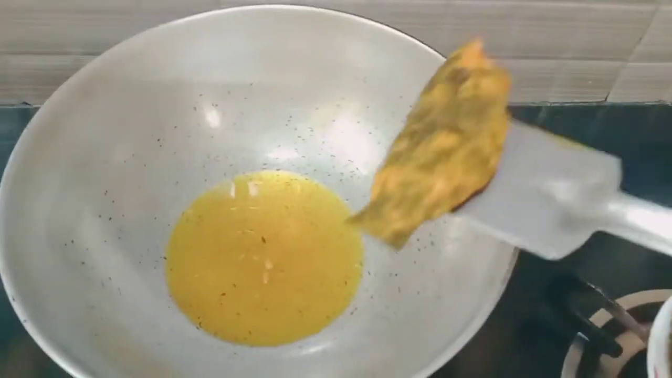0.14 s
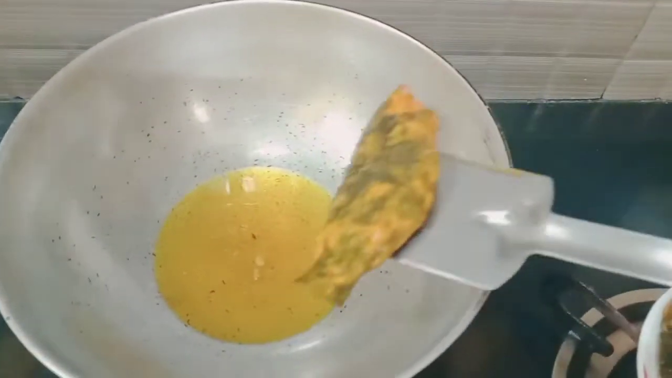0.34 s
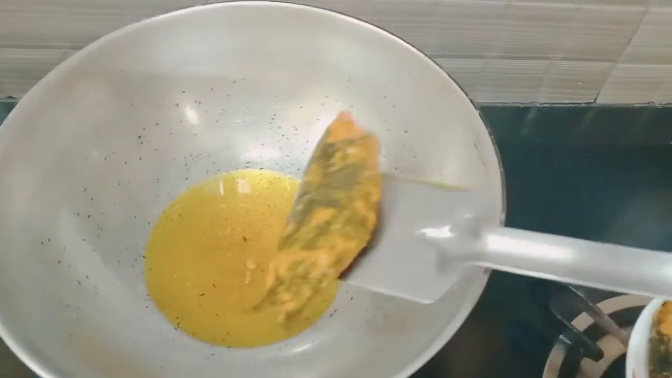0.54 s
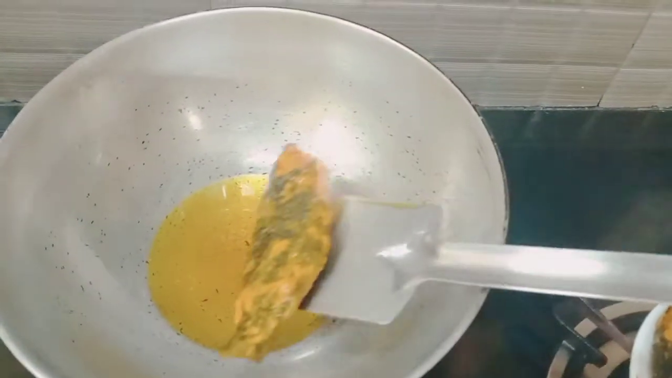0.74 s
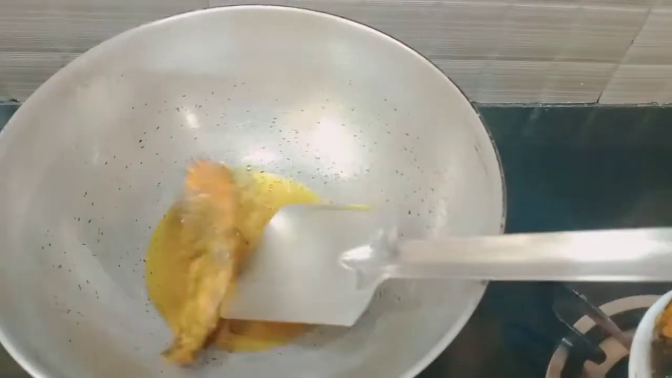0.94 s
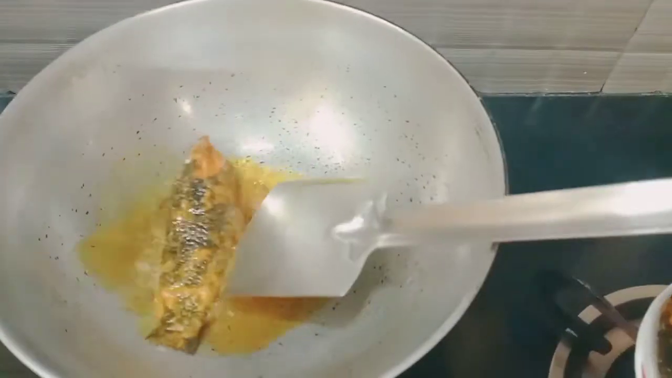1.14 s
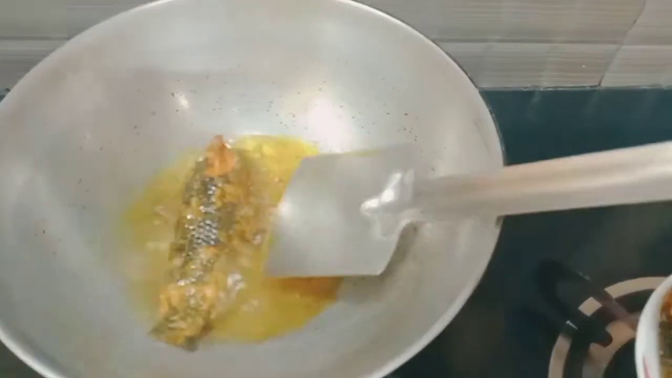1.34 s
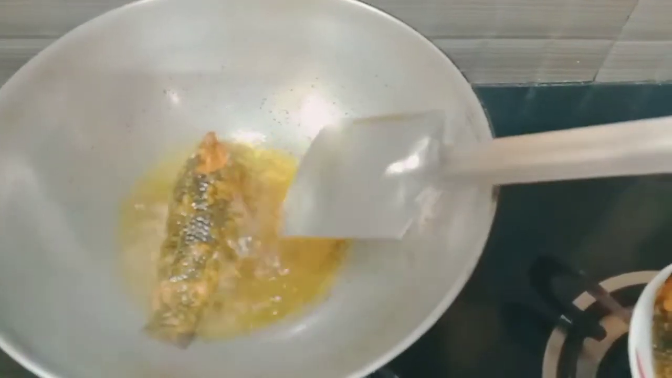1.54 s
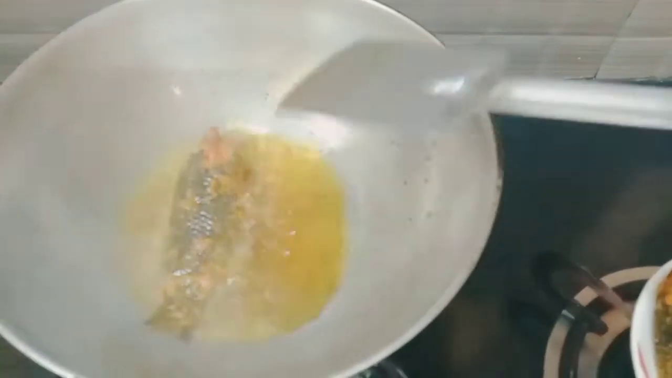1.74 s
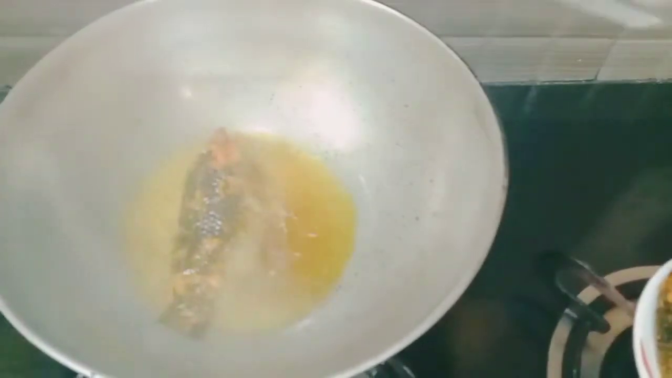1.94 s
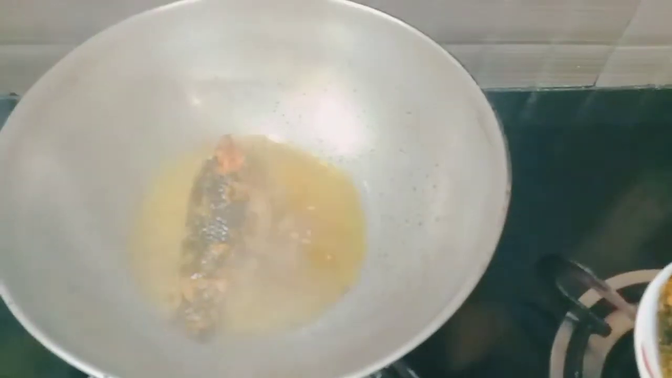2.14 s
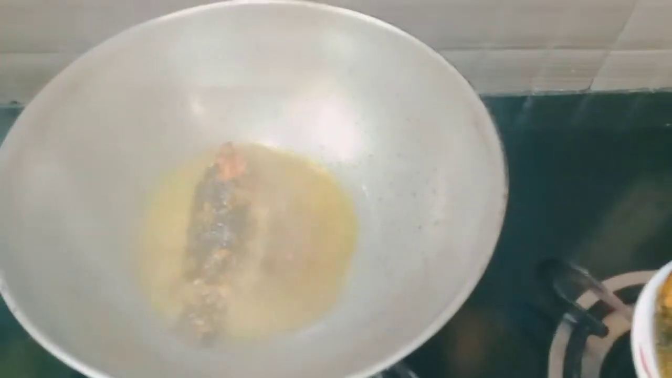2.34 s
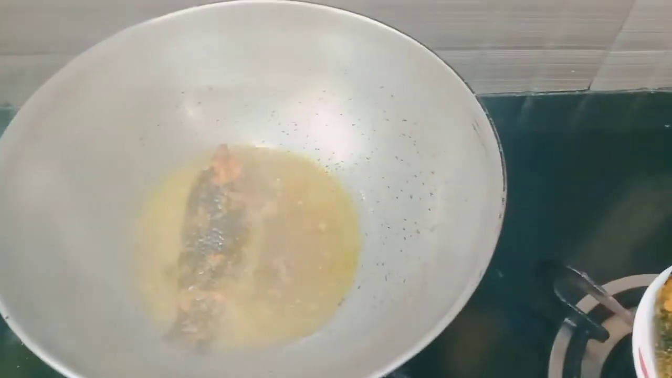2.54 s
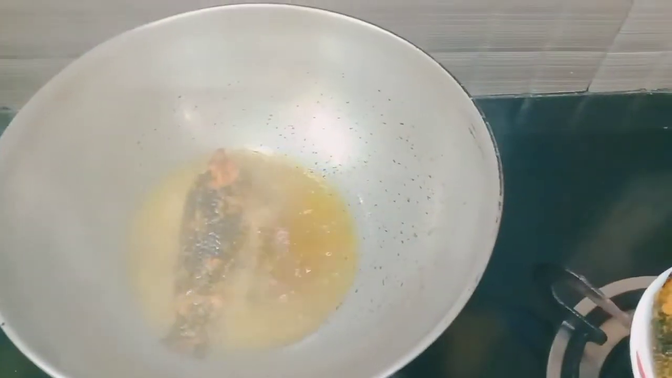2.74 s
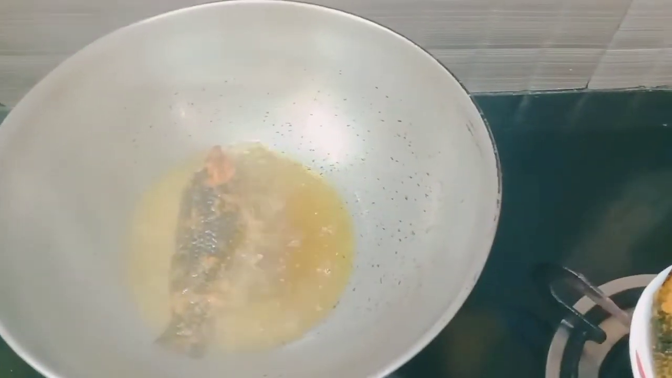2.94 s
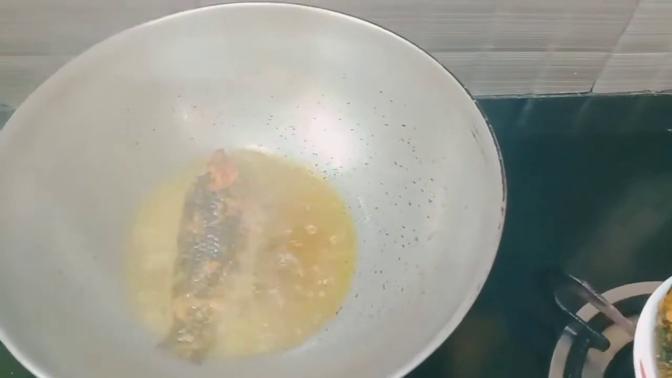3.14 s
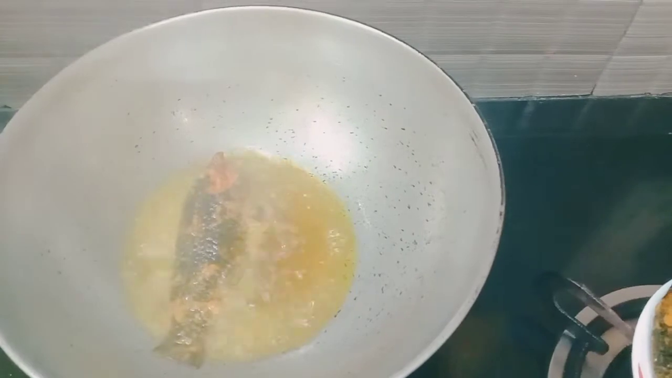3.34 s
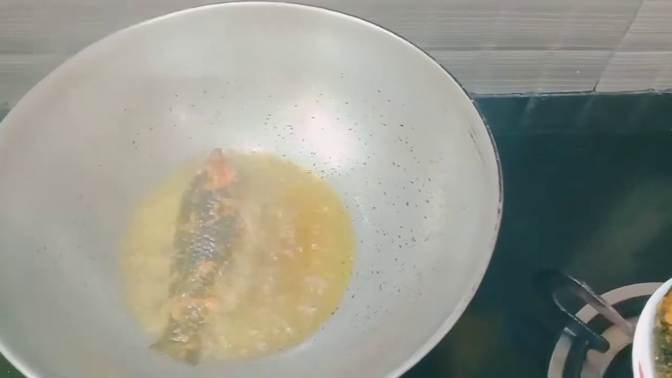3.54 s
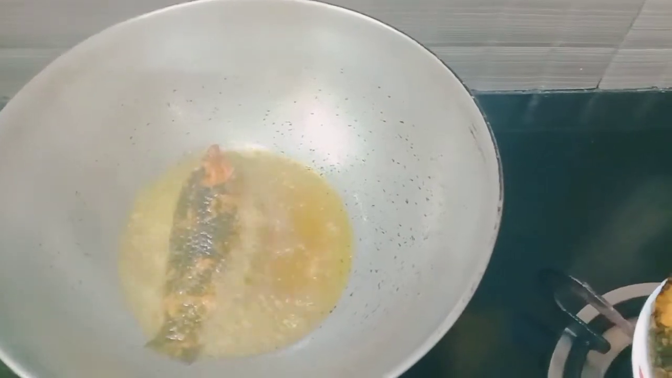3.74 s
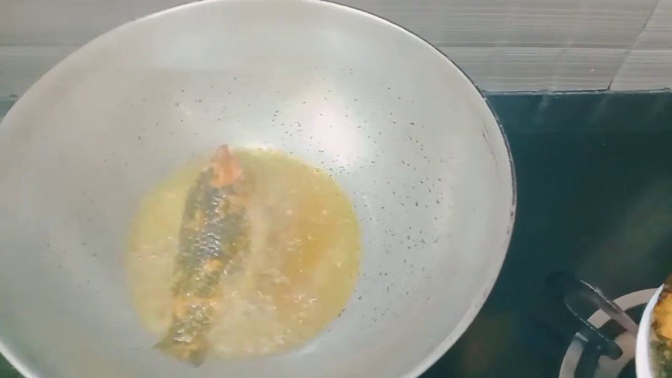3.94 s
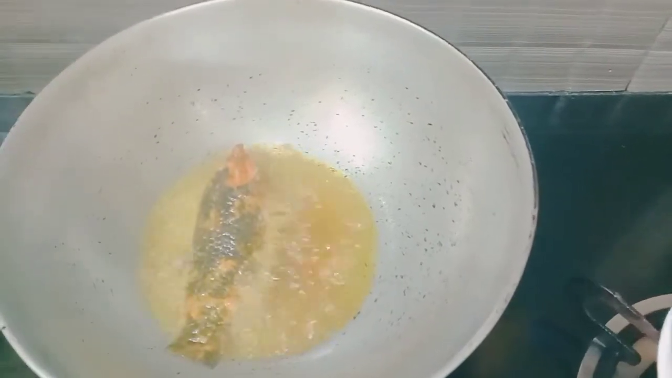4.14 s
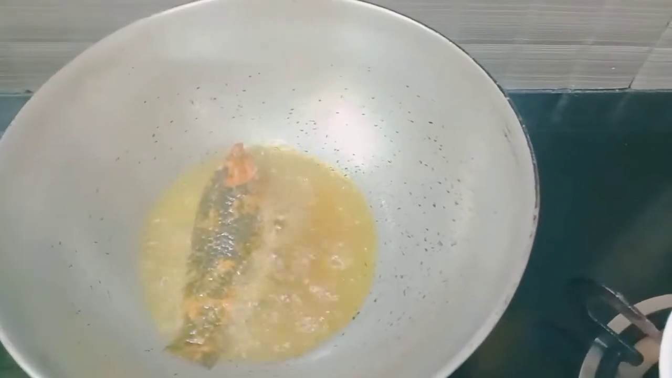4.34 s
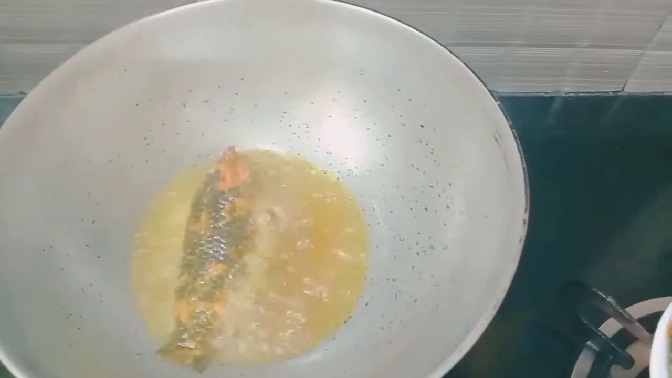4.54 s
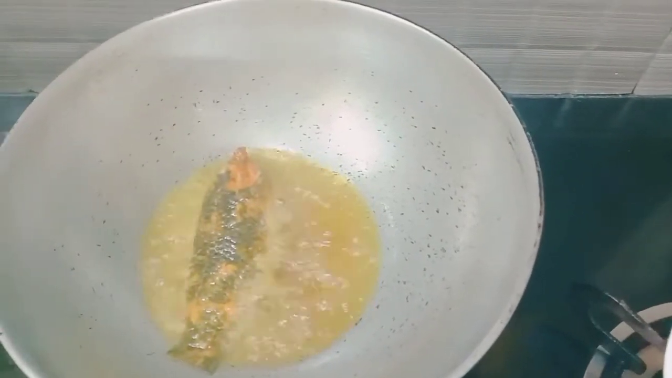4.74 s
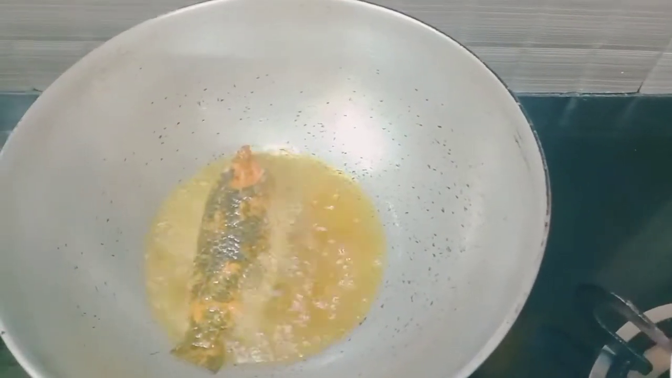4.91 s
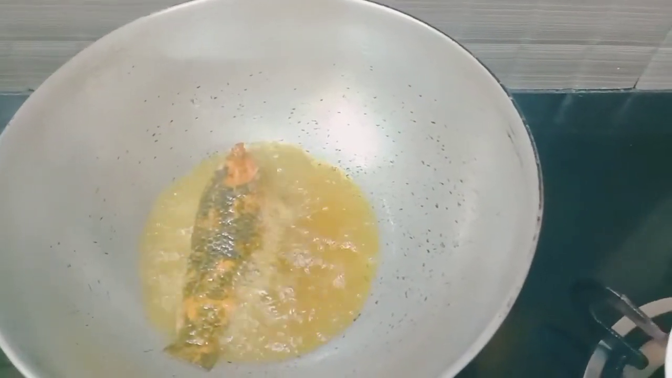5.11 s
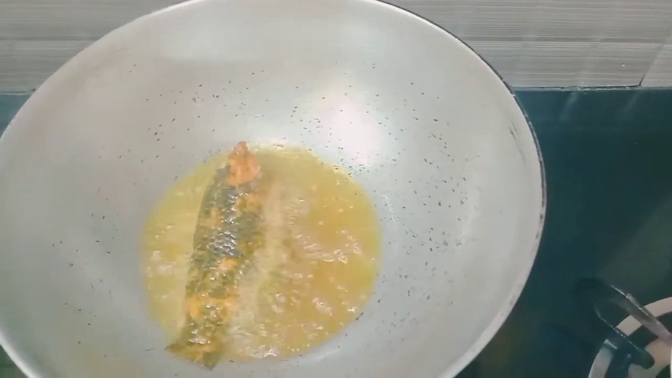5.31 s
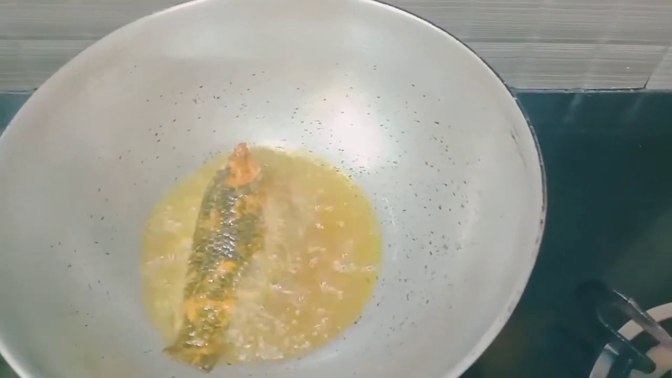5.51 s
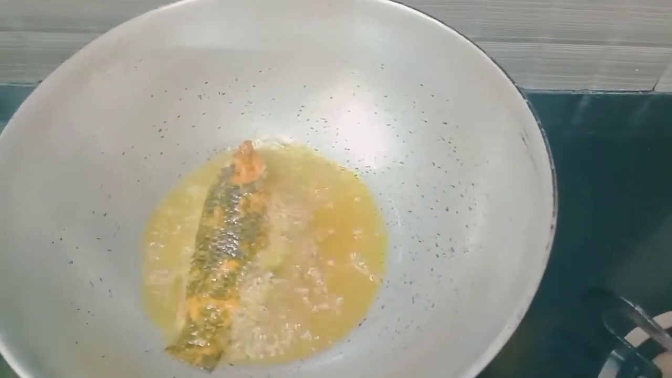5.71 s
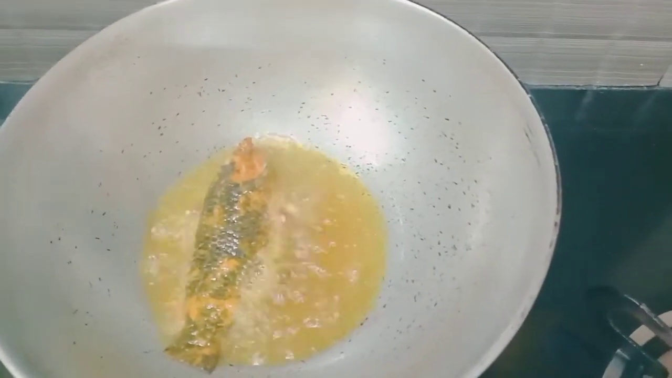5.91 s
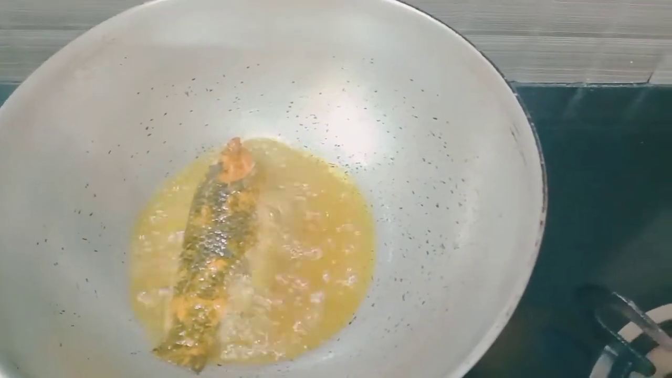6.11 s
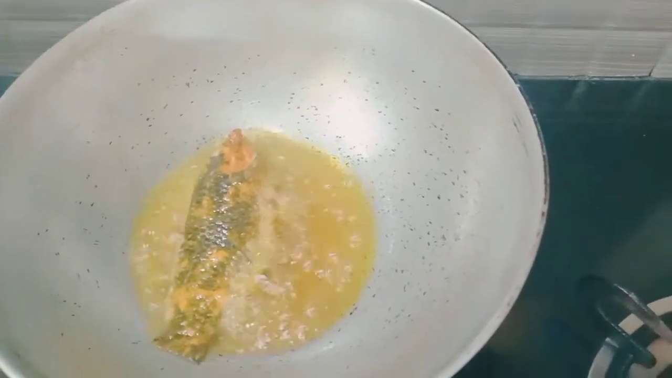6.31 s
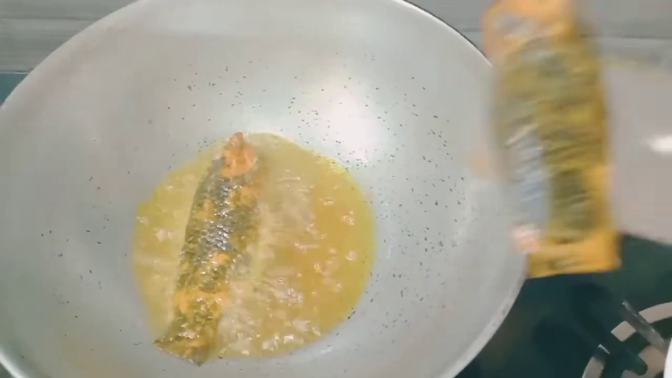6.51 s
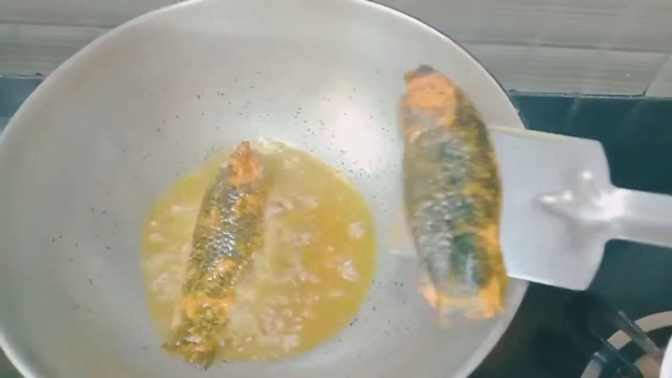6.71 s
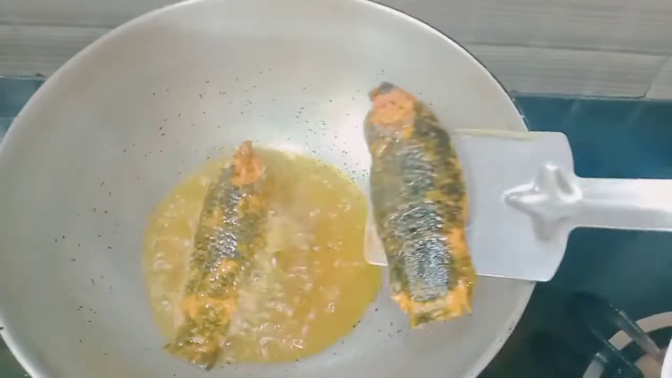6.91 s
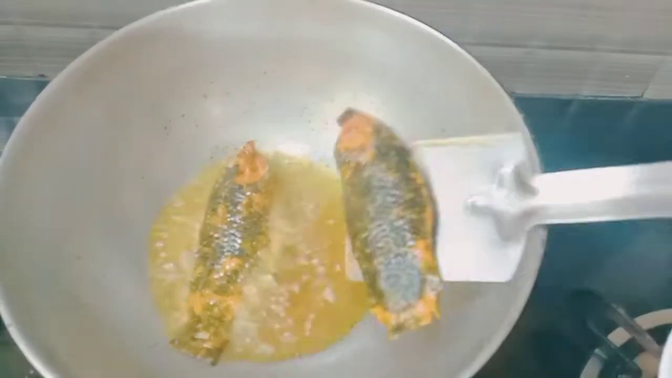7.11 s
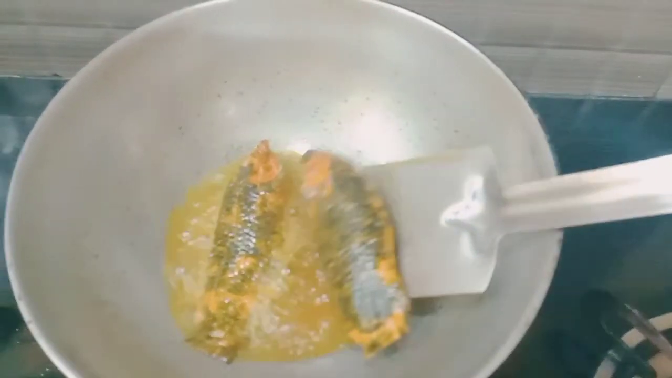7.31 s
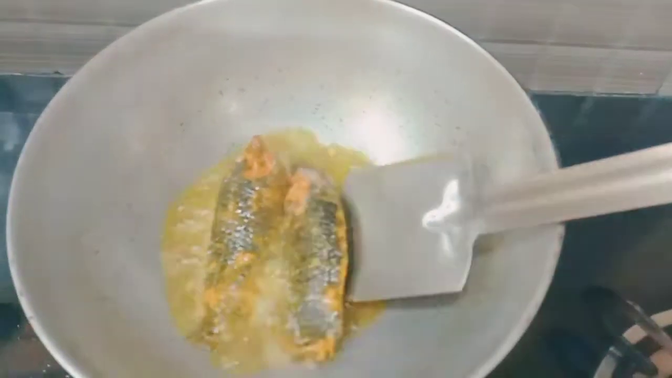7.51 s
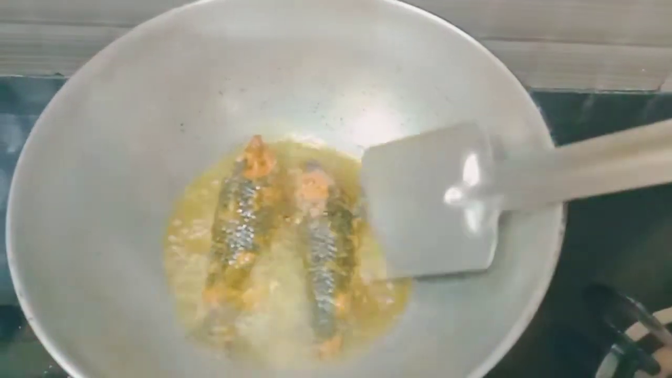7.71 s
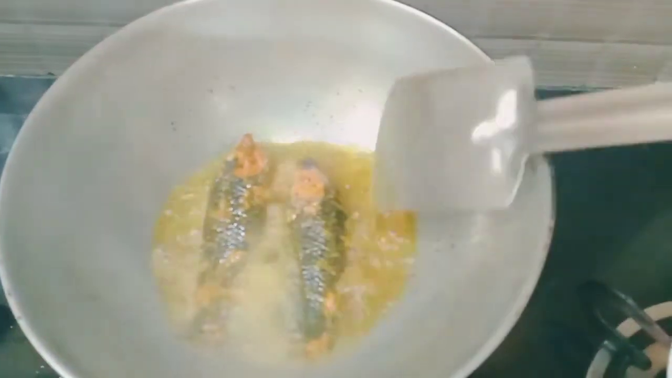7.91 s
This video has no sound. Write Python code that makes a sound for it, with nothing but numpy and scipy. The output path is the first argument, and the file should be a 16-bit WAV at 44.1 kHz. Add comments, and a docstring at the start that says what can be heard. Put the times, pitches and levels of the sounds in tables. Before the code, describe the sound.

A steel spatula ticks softly against a wok, then fish hits hot oil with a loud crackling sizzle, sharp pops, and a second flare at the end.

```python
"""A steel spatula softly taps a wok in a quiet kitchen; then a fish slides off it into the hot oil.
Water flashes to steam: filtered noise puffs make the crackle, random clicks make the bigger bubbles,
and short wave packets make the pops, many near 3 kHz. A second fish follows near the end.
The wok sings along as noise-driven ringing modes. Taps and dull worktop knocks are struck modes.
Feedback delays make the small kitchen echo, over a steady, low room tone."""
import sys
import numpy as np
from scipy import signal
from scipy.fft import rfft, irfft
from scipy.io import wavfile
from scipy.ndimage import uniform_filter1d

SR = 44100
rng = np.random.default_rng(int(sys.argv[2]) if len(sys.argv) > 2 else 0)


def transcribe(signal):
    """Save signal, clipped to [-1, 1], as a 16-bit WAV file at the path in sys.argv[1]."""
    frames = np.atleast_2d(signal).T
    limited = np.clip(frames, -1, 1)
    pcm = np.round(limited * 32767).astype(np.int16)
    wavfile.write(sys.argv[1], SR, pcm)


def rack_gain(trim_db):
    """Turn a fader trim in dB into the linear factor to multiply a signal by."""
    fader = np.asarray(trim_db, float)
    return 10 ** (fader / 20)


N = 351036  # length in samples

# How the frying flares up as each fish meets the oil, then settles:
# [t/s, fine crackle level/dB, big bubble level/dB, gain of the crackle above 7 kHz/dB]
FRYING_CURVE = [(1.012, -53, -49, 18.5), (1.054, -44.5, -55, 14), (1.07, -39, -50, 20),
                (1.13, -32, -31.5, 9), (1.26, -21, -30, -3.5), (1.31, -26.5, -25, 0),
                (1.37, -17.5, -29, -9), (1.42, -25, -24, -0.5), (1.62, -19.5, -24, -3.5),
                (2.19, -19, -22.5, -6.5), (2.65, -21, -29.5, -6), (3.2, -21, -30, -1.5),
                (4.0, -25, -32.5, 0.5), (4.6, -28.5, -36.5, 3.5), (5.9, -27, -42.5, 0),
                (7.53, -28, -41, 2.5), (7.6, -26, -33, 7), (7.96, -24, -24.5, 1.5)]
# The loudest pops: [t/s, peak level/dB, f/Hz]
LOUD_POPS = [(1.1424, -7.5, 5840), (1.2234, -12.5, 2710), (1.251, -8, 3840), (1.3544, -6.5, 2730),
             (1.4233, -9, 3190), (1.4574, 1, 3800), (1.491, -7, 3080), (1.5638, -1.5, 3330),
             (1.6583, -5.5, 3250), (1.8166, -7.5, 2710), (3.108, -11, 3200), (3.2688, -5.5, 3500),
             (3.6615, -15, 3200), (3.8583, 1, 3120), (3.994, -1.5, 3090), (4.113, -1, 2980),
             (4.1633, -8.5, 3300), (4.8072, -4, 3130), (4.952, -3.5, 3470), (4.953, -15, 1780),
             (4.9822, -8, 3340), (5.0078, -7, 3500), (5.11, -8, 3340), (5.1806, -9, 4180),
             (5.397, -10, 4380), (5.472, -12, 3400), (5.4998, -2, 3650), (5.6955, -10, 3360),
             (6.0036, -14, 3330), (6.3934, -7, 3400), (6.437, -9, 3400), (6.511, -11.5, 3260),
             (6.633, -2.5, 3460), (6.705, -8.5, 2900), (6.9344, -5.5, 3600), (6.9538, -9, 2940),
             (7.0238, -7, 5100), (7.3148, -1.5, 2930), (7.413, -6, 3250), (7.5157, -8.5, 3340),
             (7.7167, -10, 5500), (7.9266, -5, 3700)]
# Spatula touching the wok: [t/s, strength/dB, extra for long-ringing modes/dB per fourfold ring time,
# brightness/dB per octave]
SPATULA_TAPS = [(0, -62, 5, -4), (.566, -41, -2.5, 1.5), (.7225, -29, -5, 0.5), (.812, -30.5, -6.5, 0.5),
                (1.012, -37.5, -6, -2), (6.824, -19, -5.5, 0), (6.891, -20.5, -15, -6)]
# Dull knocks and drags on the worktop:
# [t/s, strength/dB, brightness/dB per octave, time for the contact to fade by 30 dB/s]
WORKTOP_KNOCKS = [(.725, -33.5, -3.5, 0.31), (1.164, -28, 5, 0.064), (3.079, -30, 2, 0.11),
                  (3.276, -30, 1.5, 0.076), (3.671, -30.5, 6, 0.98), (3.96, -33, 1, 0.036),
                  (3.996, -28.5, 7, 0.1), (4.252, -41.5, 13, 0.33), (4.399, -38, 5, 0.06),
                  (4.831, -38.5, 5, 0.029), (4.958, -28, -1, 0.15), (5.189, -41.5, 1, 0.06),
                  (5.662, -24.5, 5, 0.064), (6.819, -41, 6, 0.04), (6.878, -26, 1, 0.086),
                  (7.009, -42, 3, 0.032)]
# Ringing modes of wok and spatula: [f/Hz, relative level/dB, time to fade by 60 dB/s]
WOK_MODES = [(530, -16, 0.28), (760, -18, .1), (907, 0, 0.044), (1030, -14, 0.17), (1274, -9, 0.4),
             (1473, -0.5, 0.041), (1850, -9, 0.038), (2390, -22, 0.2), (3800, -14, .3), (3250, -11, .25),
             (3610, 2, 0.02), (4250, 0, 0.034), (5400, -13, 0.44), (5900, -16, .25), (1710, -22, 0.3),
             (7140, 0.5, 0.017)]
# Ringing modes of the worktop: [f/Hz, relative level/dB, time to fade by 60 dB/s]
WORKTOP_MODES = [(98, -17, 0.1), (145.6, -14.5, 0.19), (190, -10.5, 0.3), (280, -10, 0.059),
                 (349.6, -4.5, 0.14), (381.3, -6, 0.22), (522, -17, 0.061), (630, -12.5, 0.11),
                 (724, -9, 0.097), (850, -15, 0.046)]
# Filter that shapes the fine crackle: [f/Hz, relative gain/dB]
CRACKLE_COLOUR = [(100, -35), (500, -39), (1100, -23.5), (2050, -19.5), (2450, -12), (2700, -6),
                  (3400, -1.5), (7200, -4.5), (12000, -16.5)]
# Filter that shapes the big bubbles: [f/Hz, relative gain/dB]
BUBBLE_COLOUR = [(100, -86), (300, -18), (500, -16.5), (900, -1.5), (1500, 4), (2300, 3.5), (3300, -0.5),
                 (5000, -18.5), (9000, -9)]
# Wok modes kept going by the frying: [f/Hz, width/Hz, relative level/dB]
SINGING_MODES = [(931, 23, -30.5), (1244, 32, -20), (1540, 83, -24.5), (1730, 58, -39)]
# Filter that shapes the room tone: [f/Hz, relative gain/dB]
ROOM_TONE_COLOUR = [(18, -71), (30, -42), (59, -29), (87, -2), (150, 3.5), (216, -8.5), (538, -8),
                    (1110, -19), (1270, -19), (2630, -33), (3320, -24.5), (6360, -34), (15000, -42)]
# The dish of the wok and the microphone colour everything: [f/Hz, gain/dB]
PICKUP_COLOUR = [(30, -26), (70, -13), (130, -2.5), (980, 0), (1080, -5.5), (1200, 2), (1370, -0.5),
                 (1550, 1), (3900, -1), (4300, -3.5), (4750, 0), (7500, -0.5), (8100, -4), (10000, 2),
                 (13800, -3), (14600, 2), (15500, 4.5)]

ROOM_TONE_DB = -67.5  # rms, before the pickup
KITCHEN_T60_S, WALL_CUT_HZ, KITCHEN_DB = 0.44, 4400, -17.5
CUTOFF_HZ = 15540  # top of the pickup's range
POP_RING_HZ, POP_RING_T60_S, POP_RING_DB = 3433, 0.043, -40  # the wok mode that every pop sets ringing
IDLE_SHAKE_DB = -60  # the flame keeps the wok faintly singing


def in_time(rows):
    """Draw straight lines between the rows: one value per sample for each column after the time."""
    s, *columns = np.transpose(rows)
    return [np.interp(np.arange(N) / SR, s, column) for column in columns]


def rms_one(x):
    """Scale to unit rms."""
    return x / np.sqrt(np.mean(x ** 2) + 1e-20)


def drift(rate_hz):
    """Slow random wandering with spread 1: smoothed noise, made at every 40th sample."""
    r = np.exp(-2 * np.pi * rate_hz * 40 / SR)
    noise = rng.standard_normal(N // 40 + 2002)
    slow = signal.lfilter([1], [1, -2 * r, r * r], noise)[2000:]  # skip the filter's start-up
    return np.interp(np.arange(N) / 40, np.arange(len(slow)), rms_one(slow))


def colour(x, spectrum, size=4096):
    """Filter that follows a table of f/Hz and gain/dB without sounding early (minimum phase)."""
    hz, db = np.transpose(spectrum)
    grid = np.maximum(np.arange(size // 2 + 1) * SR / size, 1)
    gain = rack_gain(np.interp(np.log(grid), np.log(hz), db))
    # Folding the cepstrum forward in time gives the minimum-phase response.
    cepstrum = irfft(np.log(gain))
    cepstrum[1:size // 2] *= 2
    cepstrum[size // 2 + 1:] = 0
    response = irfft(np.exp(rfft(cepstrum)))
    return signal.fftconvolve(x, response)[:N]


def ring(clicks, hz, t60):
    """A resonance: each unit click starts a dying sine of height 1 that falls by 60 dB in t60 seconds."""
    r, w = rack_gain(-60 / (t60 * SR)), 2 * np.pi * hz / SR
    return signal.lfilter([0, np.sin(w)], [1, -2 * r * np.cos(w), r * r], clicks + 1e-18)


def grains(per_s, spread_db, clump_db, clump_rate):
    """Random clicks of very uneven size, whose density wanders so that they come in clumps."""
    sizes = rack_gain(spread_db * np.minimum(rng.exponential(1, N), 6)) * rng.choice([-1, 1], N)
    chance = per_s * rack_gain(clump_db * drift(clump_rate)) / SR
    return sizes * (rng.random(N) < chance)


def strike(rows, contact_s, modes, weigh_db, scatter_db):
    """Each contact is a dying noise rattle that drives every mode with its own random strength."""
    luck, out = rng.standard_normal((len(rows), len(modes))), np.zeros(N)
    for k, (hz, level_db, t60) in enumerate(modes):
        push = np.zeros(N)
        for row, length, chance in zip(rows, contact_s, luck[:, k]):
            fade = rack_gain(-30 * np.arange(int(2 * length * SR) + 1) / (length * SR))
            fade_one = fade / np.sqrt(np.sum(fade ** 2))  # unit energy on average, long or short
            gain = rack_gain(row[1] + level_db + weigh_db(row, hz, t60) + scatter_db * chance)
            i = int(row[0] * SR)
            push[i:i + len(fade)] += gain * fade_one * rng.standard_normal(len(fade))
        out += ring(push, hz, t60)
    return out


def crackle(level_db, treble_db):
    """Tiny droplets burst by the thousand, each a puff of about a millisecond, over a smooth steam hiss."""
    bursts = np.abs(grains(2500, spread_db=3.5, clump_db=4.0, clump_rate=27))
    envelope = signal.lfilter([1], [1, -rack_gain(-60 / (0.0014 * SR))], bursts)
    puffs = rms_one(envelope * rng.standard_normal(N))
    hiss = rack_gain(1.0) * rng.standard_normal(N)
    fizz = rms_one(colour(puffs + hiss, CRACKLE_COLOUR))
    top = signal.sosfilt(signal.butter(2, 7000, "high", fs=SR, output="sos"), fizz)
    low = signal.sosfilt(signal.butter(2, 7000, "low", fs=SR, output="sos"), fizz)
    # The two filters are in opposite phase where they meet, so subtracting joins them.
    return rack_gain(level_db + 0.92 * drift(6)) * (low - rack_gain(treble_db) * top)


def bubbles(level_db):
    """Larger steam bubbles at the fish's skin collapse as random clicks, filtered lower and duller."""
    collapses = grains(5000, spread_db=3.5, clump_db=3.0, clump_rate=20)
    return rack_gain(level_db + 1.53 * drift(3.2)) * rms_one(colour(collapses, BUBBLE_COLOUR))


def pop_shape(hz, peak_cycles, echo_s, echo_db):
    """A packet of a few cycles that swells and dies, then two reflections off the wok wall."""
    t = np.arange(400) * hz / SR / peak_cycles  # 1 at the height of the swell
    first = t ** 2 * np.exp(-2 * t) * np.sin(2 * np.pi * peak_cycles * t)
    lag = round(echo_s * SR)
    echoes = rack_gain(echo_db) * np.roll(first, lag) + rack_gain(2 * echo_db) * np.roll(first, 3 * lag)
    return (first + echoes) / np.abs(first).max()


def pops(level_db):
    """Water pockets burst under the oil: loud ones from the table, many small ones by chance."""
    out = np.zeros(N + 400)
    for (s, peak_db, hz), luck in zip(LOUD_POPS, rng.random((len(LOUD_POPS), 2))):
        i = int((s - .0004) * SR)  # start a little early, so the swell lands near its time
        shape = pop_shape(hz, 1.9 + luck[0], .0018 + .0006 * luck[1], echo_db=-7)
        out[i:i + 400] += rack_gain(peak_db) * shape
    small = np.tanh(grains(900, spread_db=6.5, clump_db=6, clump_rate=11) / 25.0)  # sizes level off
    pitches = np.geomspace(2700, 6800, num=14)
    dealt = rng.integers(0, len(pitches), size=N)  # which pitch each small pop gets
    swarm = np.zeros(N)
    for k, hz in enumerate(pitches):
        shape = pop_shape(hz, 1.82, 0.0019, echo_db=-6)
        weight = rack_gain(-5 * abs(np.log2(hz / 3500)))  # weaker away from 3500 Hz
        swarm += weight * signal.fftconvolve(small * (dealt == k), shape)[:N]
    bursts = out[:N] + rack_gain(level_db - 3.5) * rms_one(swarm)
    return bursts + rack_gain(POP_RING_DB) * ring(bursts, POP_RING_HZ, POP_RING_T60_S)


def singing(frying):
    """The frying shakes the wok: noise as strong as the frying drives low modes that stand out of the hiss."""
    power = uniform_filter1d(frying ** 2, size=2000) + rack_gain(IDLE_SHAKE_DB) ** 2
    push = np.sqrt(power) * rng.standard_normal(N)
    out = np.zeros(N)
    for hz, width_hz, db in SINGING_MODES:
        t60 = np.log(1000) / (np.pi * width_hz)  # a wider resonance dies sooner
        out += rack_gain(db) * np.sqrt(width_hz / SR) * ring(push, hz, t60)
    return out


def taps():
    """Steel on aluminium: clear modes, a crowd of weak shell modes, and a blur of those too dense to tell apart."""
    pitches = np.sort(rng.uniform(600, 13000, size=260))
    lives = .25 * (pitches / 3000) ** -.15 * rack_gain(2 * rng.standard_normal(260))
    crowd = [(hz, -20 - 4 * np.log2(hz / 3000), t60) for hz, t60 in zip(pitches, lives)]
    blur = [(hz, -6 - 3 * np.log2(hz / 1000), 1.3 / hz) for hz in np.geomspace(900, 11000, num=7)]

    def brightness_db(row, hz, t60):
        return row[3] * np.log2(hz / 1000)

    def ring_and_brightness_db(row, hz, t60):
        return row[2] * np.log2(t60 / 0.1) / 2 + brightness_db(row, hz, t60)

    count = len(SPATULA_TAPS)
    clear = strike(SPATULA_TAPS, [.008] * count, WOK_MODES + crowd, ring_and_brightness_db, scatter_db=2.0)
    blurred = strike(SPATULA_TAPS, [.28] * count, blur, brightness_db, scatter_db=0.8)
    return rack_gain(-5.5) * clear + rack_gain(12) * blurred


def knocks():
    """Soft blows and drags drive the worktop's modes over a broad thud; brighter ones reach higher."""
    contact_s = np.array(WORKTOP_KNOCKS)[:, 3]
    thud = [(hz, -4, 2.1 / hz) for hz in np.geomspace(120, 900, num=4)]

    def brightness_db(row, hz, t60):
        return row[2] * np.log2(hz / 300)

    return strike(WORKTOP_KNOCKS, contact_s, WORKTOP_MODES + thud, brightness_db, scatter_db=0.5)


def kitchen(x):
    """Small-room echo: eight delays feed back into themselves, weaker and duller on every round."""
    out, dull = np.zeros(N), np.exp(-2 * np.pi * WALL_CUT_HZ / SR)
    lags = (rng.uniform(.012, .035, size=8) * SR).astype(int)
    for k, lag in enumerate(lags):
        loop, gain, state = x.copy(), rack_gain(-60 * lag / SR / KITCHEN_T60_S), [0.]
        for i in range(lag, N, lag):  # one round trip at a time
            back, state = signal.lfilter([gain * (1 - dull)], [1, -dull], loop[i - lag:i], zi=state)
            loop[i:i + lag] += back[:N - i]
        out += (loop - x) * (-1) ** k  # echoes only, with alternating sign
    return out


def room_tone():
    """The steady, low background of the kitchen: filtered noise."""
    return rack_gain(ROOM_TONE_DB) * rms_one(colour(rng.standard_normal(N), ROOM_TONE_COLOUR))


def scene():
    """Mix all sources and the kitchen echo; nothing fries until the first fish touches the oil."""
    fine_db, big_db, treble_db = in_time(FRYING_CURVE)
    touched = np.arange(N) > FRYING_CURVE[0][0] * SR
    frying = touched * (crackle(fine_db, treble_db) + bubbles(big_db) + pops(fine_db))
    near = frying + rack_gain(9.5) * singing(frying) + taps() + knocks()
    return (near + rack_gain(KITCHEN_DB) * kitchen(near) + room_tone())[None]


def band_limit(x):
    """A steep low-pass at the top of the band."""
    return signal.sosfilt(signal.butter(12, 16860, fs=SR, output="sos"), x)


def record(dry):
    """The pickup colours the sound, rounds off its peaks and cuts the top of its range."""
    coloured = colour(dry[0], PICKUP_COLOUR)[None]
    rounded = 0.93 * np.tanh(coloured / 0.97)
    top_cut = signal.ellip(10, .5, 70, CUTOFF_HZ, fs=SR, output="sos")
    heard = signal.sosfilt(top_cut, rounded)
    return band_limit(heard)


dry = scene()
out = record(dry)
transcribe(out)
```